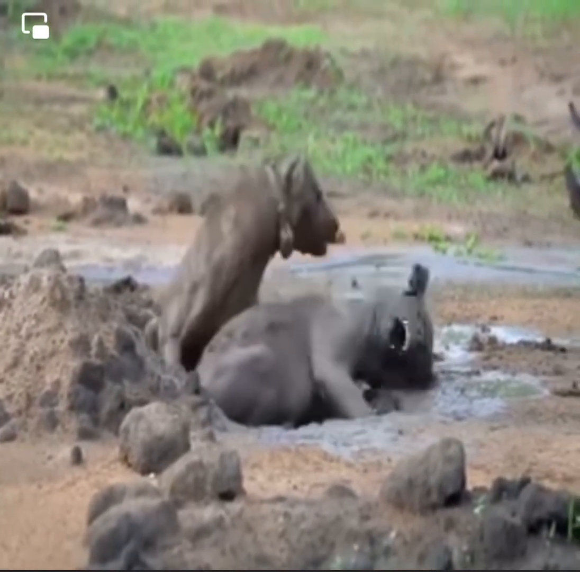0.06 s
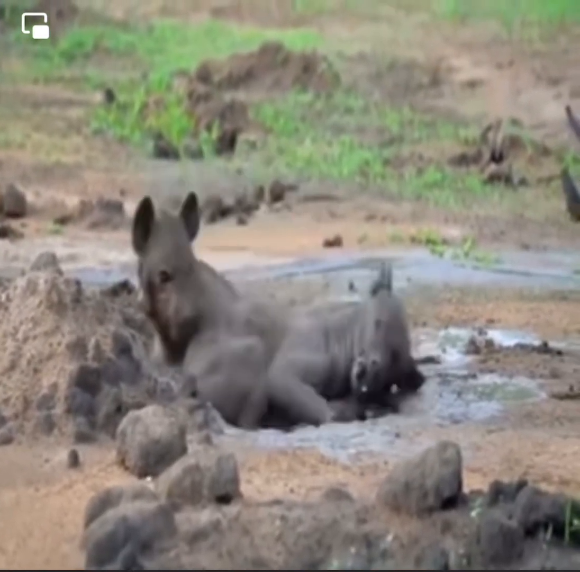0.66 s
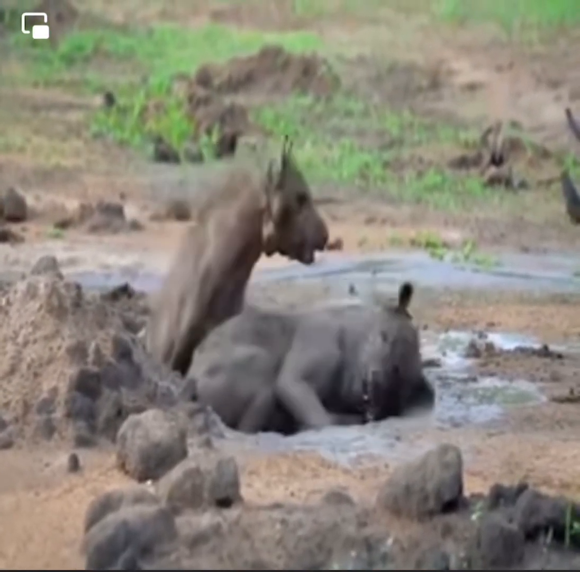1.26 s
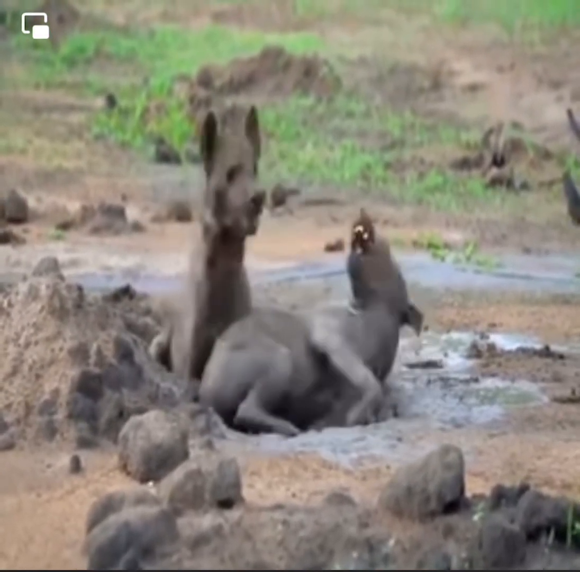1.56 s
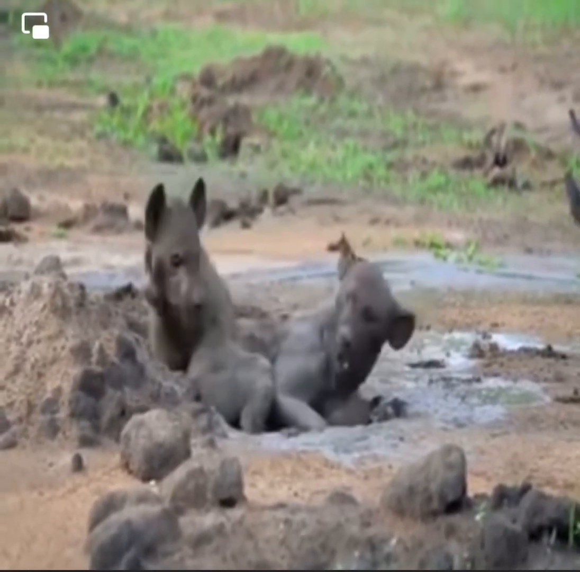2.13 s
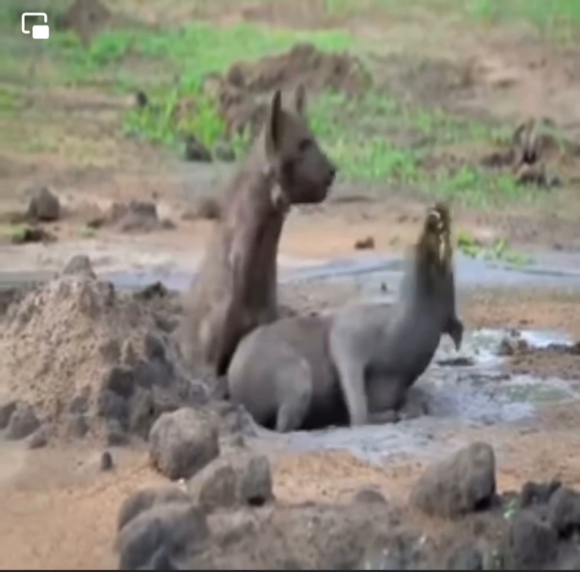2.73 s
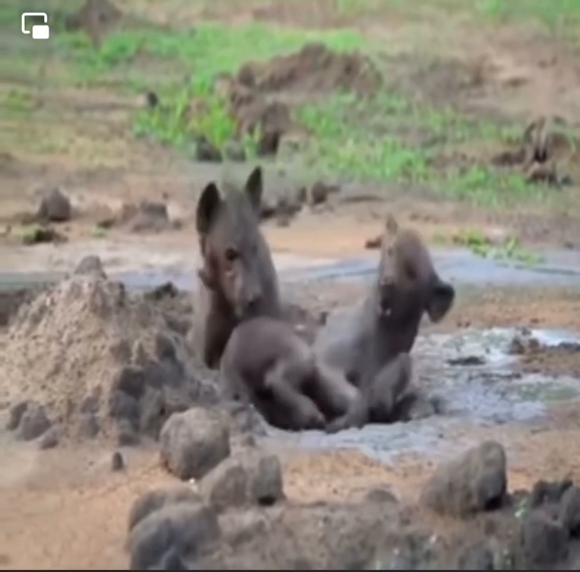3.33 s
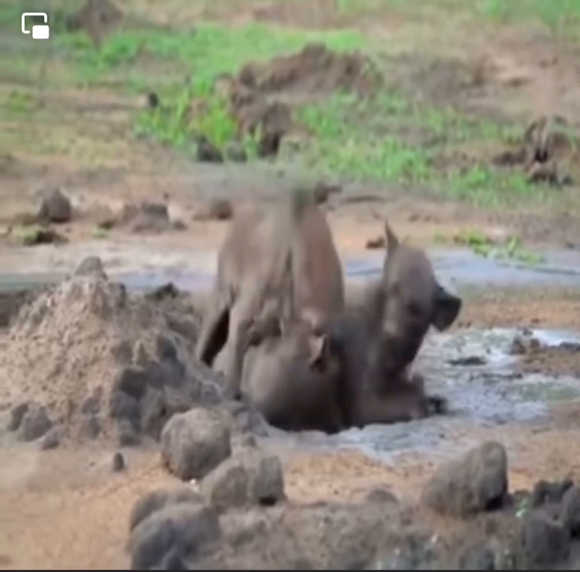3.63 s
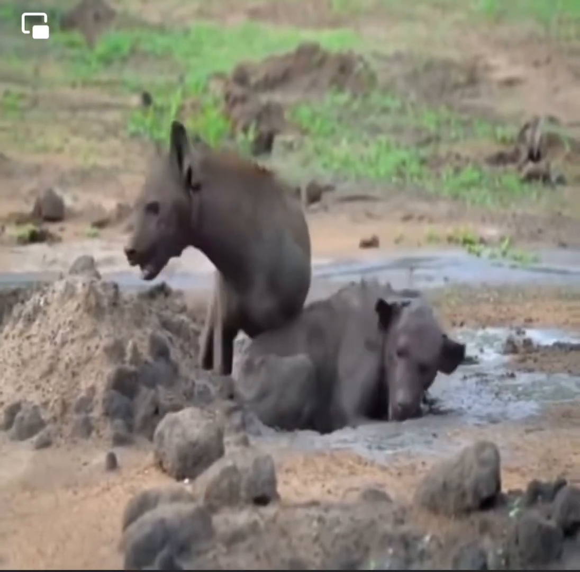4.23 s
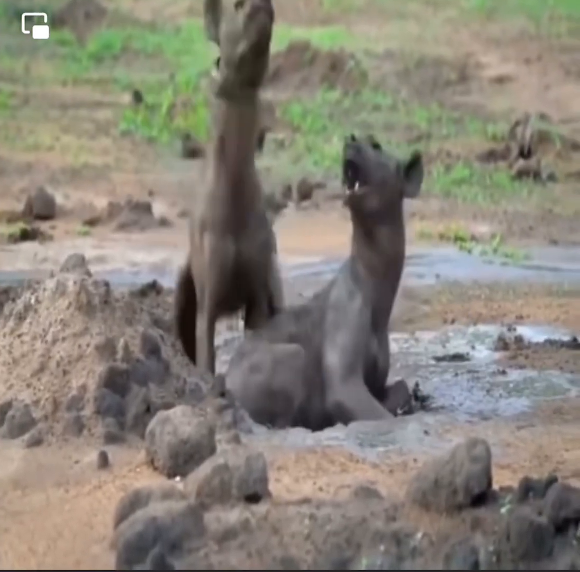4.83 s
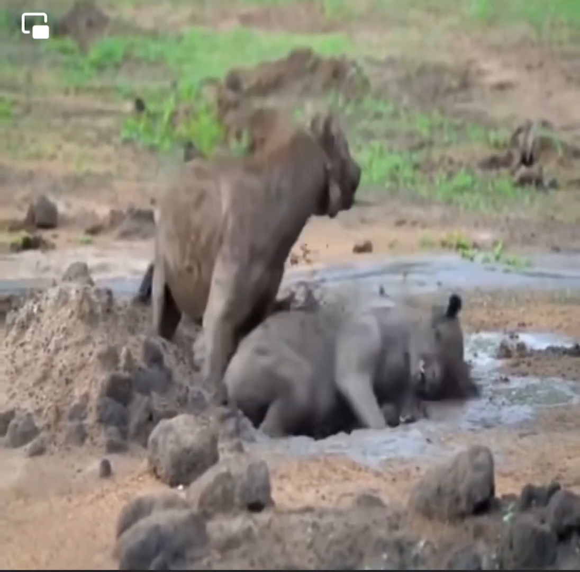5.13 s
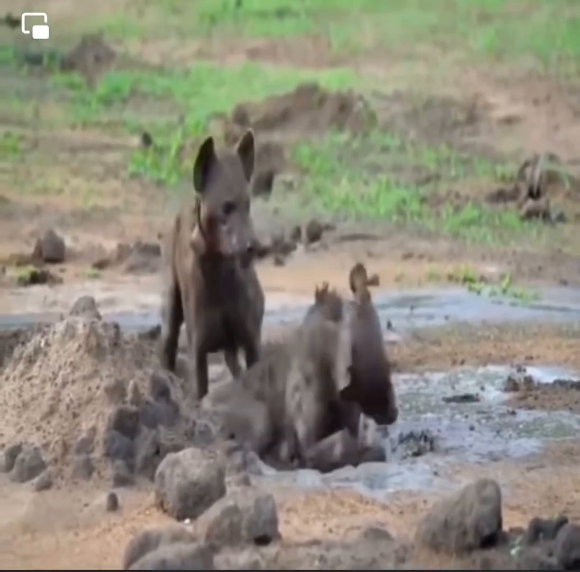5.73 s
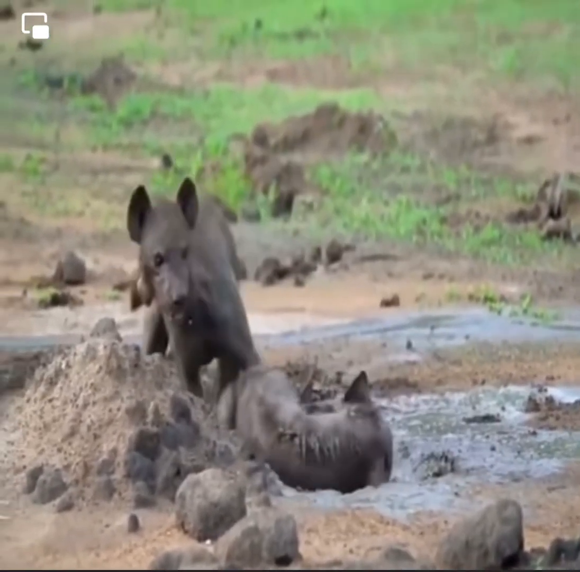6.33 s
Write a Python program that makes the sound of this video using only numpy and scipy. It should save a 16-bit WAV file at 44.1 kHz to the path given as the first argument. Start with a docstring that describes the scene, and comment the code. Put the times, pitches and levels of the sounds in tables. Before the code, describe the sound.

Rattling growls of fighting hyenas build to a yelp and squeal, then sink to a moan, over churning mud and faint bird chirps.

```python
"""Hyenas fighting in a mud hole

Slack vocal folds beat against throat, muzzle and jaw in rattling growls and snarls, then tighten
into a yelp and a harsh squeal; more growls end in a long moan. Mud churns, slops and smacks
under the two animals. A small bird chirps and a far bird coos over a background hiss that ducks
after the squeal. The loudest cries overload the microphone."""
import sys
import numpy as np
from scipy import signal
from scipy.fft import rfft, irfft, next_fast_len
from scipy.io import wavfile
from scipy.ndimage import uniform_filter1d

SR = 44100
rng = np.random.default_rng(int(sys.argv[2]) if len(sys.argv) > 2 else 0)


def bounce(signal):
    """Save signal as a 16-bit WAV file at the path given by the first command-line argument."""
    frames = np.transpose(np.atleast_2d(signal))
    limited = np.clip(frames, -1, 1)
    pcm = np.round(limited * 32767).astype(np.int16)
    wavfile.write(sys.argv[1], SR, pcm)


N = 290023
T = np.arange(N) / SR
THROAT_HZ, MUZZLE_HZ = 323.7, 992  # where the two resonances rest


def fold_beat(levels, throat_hz, muzzle_hz, rough, rebound_gain, rebound_s=.0064, puff_s=.015):
    """One beat of the folds, a weaker rebound and a puff of air ring the throat, muzzle and open jaw."""
    # resonances of the three parts of the voice: (frequency [Hz], gain [dB])
    throat = [(35, -61), (85, -10.5), (165, -6), (220, -10), (280, 0.5), (345, 2.5), (460, -8),
              (550, -19.5), (650, -41), (900, -32), (2500, -58), (8000, -88)]
    muzzle = [(60, -52), (700, -16), (850, -1), (950, 10), (1030, 9.5), (1130, -17.5), (1400, -6.5),
              (1580, -21), (1770, -9), (2500, -25.5), (8000, -52.5)]
    jaw = [(40, -49), (130, -18), (450, 1), (530, -2), (630, 8), (740, 3), (850, -2), (1050, 1.5),
           (1380, 3), (1580, -19), (1720, -4.5), (2120, -10.5), (2500, -49), (5500, -25), (14000, -50)]
    size = 2048
    hz, t = np.fft.rfftfreq(size, 1 / SR), T[:size]
    parts = (read(throat, hz * THROAT_HZ / throat_hz),
             read(muzzle, hz * MUZZLE_HZ / muzzle_hz),
             read(jaw, hz))
    power = sum((amp(db) * unit(amp(part))) ** 2 for db, part in zip(levels, parts))
    log_gain = .5 * np.log(power + 1e-14)
    mirrored = np.r_[log_gain, log_gain[-2:0:-1]]
    tract = np.exp(np.conj(signal.hilbert(mirrored)))[:len(hz)]  # minimum phase: a hit, then its ring
    puff = rfft(.11 * rough * np.exp(-t / puff_s) * rng.standard_normal(size))
    delay_s = rebound_s * (1 + .0904 * rng.standard_normal())
    drive = 1 + rebound_gain * np.exp(-2j * np.pi * hz * delay_s) + puff
    return irfft(tract * drive / np.sqrt(np.mean(abs(drive) ** 2)))


def growl(t, beat_s, rate, rough, throat_db, muzzle_db, jaw_db, muzzle_hz=MUZZLE_HZ):
    """Slack folds beat, once near beat_s; each beat varies in time, strength, sharpness and vowel."""
    # the throat's resonance sinks and rises from growl to growl: (time [s], frequency [Hz])
    throat_vowel = [(1.8, 334), (2.35, 296), (3.0, 335), (5.2, 314), (5.45, 357)]
    throat_hz, = curves(throat_vowel, t)
    cycles = np.cumsum(rate) / SR
    beats = np.flatnonzero(np.diff(np.floor(cycles - np.interp(beat_s, t, cycles))))
    jitter = rough * rng.uniform(-1.344, 1, (100, 5))
    voice = np.zeros(len(t) + SR // 10)
    for k, (late, strong, sharp, throat_shift, muzzle_shift) in zip(beats, jitter):
        levels = np.array([throat_db[k], muzzle_db[k] + 9 * sharp, jaw_db[k] + 9 * sharp]) + 2.5 * strong
        # the folds rebound only in the slow rattle, with the jaw nearly shut
        slowness = np.clip((85 - rate[k]) / 20, 0, 1)
        rebound_gain = .85 * slowness / (1 + amp(jaw_db[k] - throat_db[k]) ** 2)
        vowel = throat_hz[k] * (1 + .08 * throat_shift), muzzle_hz * (1 + .1 * muzzle_shift)
        ring = fold_beat(levels, *vowel, rough, rebound_gain)
        add(voice, k / SR + .09 * late / rate[k], ring * np.sqrt(SR / rate[k]))
    return t[0], voice


def rattles(attack_s=.05, attack_db=16, release_db_per_s=219, tail_s=.079):
    """Slow growls of separate fold beats: each swells in, holds and releases or yields to the next."""
    # (start [s], length [s], first level [dB], last level [dB], beat rate [Hz], roughness [0-1],
    #  muzzle over throat [dB], open jaw over throat [dB], muzzle resonance [Hz])
    cues = [(0.043, 0.19, -30.5, -29.5, 51.47, 0.42, -7, -21, 1073),
            (.281, 0.052, -27, -24, 55.9, 0.18, -4, -1.5, 970),
            (.703, 0.17, -19, -14, 57.6, 0.34, -2.5, -8, 980),
            (.894, 0.062, -11.5, -14, 68.44, 0.32, -7, -4.5, 937),
            (1.661, 0.25, -25.5, -24.5, 58.6, 0.47, -8.5, -3, 1010),
            (1.939, 0.09, -20.5, -19.5, 56.1, 0.52, -8.5, -9.5, 1013),
            (2.049, 0.21, -16.5, -20, 59.46, 0.43, -4, -9.5, 995),
            (2.267, 0.16, -16, -16.5, 57.1, 0.53, -10, -13, 1045),
            (3.09, 0.19, -40, -39, 55.1, .5, 4.5, 0, 1008),
            (3.323, 0.2, -19.5, -28, 52.74, 0.53, -10, -7, 913),
            (3.535, 0.2, -21.5, -14, 55.1, 0.3, -15.5, -13, 940),
            (5.104, 0.076, -27.5, -22.5, 66.1, 0.36, -3, -6, 993),
            (5.18, 0.097, -20.5, -24, 58.8, 0.34, 0, -2.5, 783),
            (5.28, 0.039, -21, -18.5, 58.4, 0.23, -1.5, -3, 1140),
            (5.336, 0.1, -17, -17.5, 69.54, 0.51, -9, -16, 1025),
            (5.46, .15, -23.5, -18.5, 65.8, .55, -14, -8.5, 985),
            (5.622, 0.16, -14.5, -20.5, 68.06, 0.52, -3.5, -15, 1027),
            (5.825, 0.15, -15.5, -15.5, 71.23, 0.53, -9, -10, 1014),
            (5.974, 0.085, -14.5, -18.5, 75.35, 0.24, -1, -7.5, 977)]
    previous_ends = [0] + [cue[0] + cue[1] for cue in cues]
    next_starts = [cue[0] for cue in cues[1:]] + [T[-1]]
    voice = np.zeros(N)
    for since, until, cue in zip(previous_ends, next_starts, cues):
        start, length, first_db, last_db, hz, rough, muzzle_db, jaw_db, muzzle_hz = cue
        half_beat = .5 / hz
        begin = np.clip(since - start, -attack_s, -half_beat)
        end = min(length + tail_s, until - start - half_beat)
        t = np.arange(begin, end, 1 / SR)
        effort = np.interp(t, [0, length], [first_db, last_db])
        effort -= attack_db * np.maximum(-t / attack_s, 0) + release_db_per_s * np.maximum(t - length, 0)
        levels = effort, effort + muzzle_db, effort + jaw_db
        add(voice, *growl(start + t, start, np.full(len(t), hz), rough, *levels, muzzle_hz))
    return voice


def snarls(rise_db=13.5, muzzle_follows=.67, jaw_follows=1.76):
    """Short pushes of faster beats: effort rises, holds and slackens; the jaw gapes near the crest."""
    # (start [s], crest [s], hold [s], end [s], first rate [Hz], crest rate [Hz], last rate [Hz], crest
    #  level [dB], fall [dB], roughness [0-1], muzzle over throat [dB], open jaw over throat [dB])
    cues = [(0.336, 0.344, 0.12, .50, 90.8, 109.3, 144.7, -22.5, 6, 0.35, -10.5, 1),
            (0.491, 0.532, 0.056, .69, 127, 161.7, 124, -13.5, 14.5, 0.12, -4.5, -1.5),
            (1.471, 1.518, 0.046, 1.62, 129.8, 127.3, 111, -28, 22, 0.2, -6.5, -16),
            (2.79, 2.897, 0.039, 3.08, 98, 141.4, 75.1, -21.5, 16, 0.56, -2.5, -9),
            (4.752, 4.932, 0.03, 5.02, 89.8, 78.6, 73, -28.5, 15, 0.45, -5.5, -16)]
    voice = np.zeros(N)
    for start, crest, hold, end, *rates, db, fall_db, rough, muzzle_db, jaw_db in cues:
        t = np.arange(start, end, 1 / SR)
        before = np.interp(t, [start, crest], [1, 0])
        after = np.interp(t, [crest + hold, end], [0, 1])
        slack = rise_db * before ** .81 + fall_db * after ** .7
        rate = np.interp(t, [start, crest, end], rates)
        levels = db - slack, db + muzzle_db - muzzle_follows * slack, db + jaw_db - jaw_follows * slack
        add(voice, *growl(t, crest, rate, rough, *levels))
    return voice


def yelp(rough=.31, hiss_db=-20):
    """The growl tightens into a loud rising cry whose harmonics clear just before the squeal."""
    # (time [s], beat rate [Hz], throat [dB], muzzle [dB], open jaw [dB], clear tone [dB])
    contour = [(3.735, 66, -19, -25, -21, -19), (3.78, 104, -14.5, -19, -19, -15.5),
               (3.815, 116, -15.5, -20, -15.5, -9.5), (3.865, 122, -14.5, -32, -11, -7.5),
               (3.905, 145, -23, -9, -21, -9), (3.95, 197, -48, -13.5, -24, -10),
               (4.005, 196, -48, -12.5, -16.5, -8.5), (4.032, 206, -42, -16, -30, -5.5)]
    # colour of the clear tone and of its hiss: (frequency [Hz], gain [dB])
    cry_tone = [(110, -24), (195, -16), (228, 13.5), (290, 15), (350, 7.5), (395, -20), (490, 6.5),
                (580, 11.5), (780, 11), (860, -6), (960, 5), (1150, 9.5), (1350, 1), (1550, -24),
                (1730, 2.5), (2100, -11.5), (5000, -45)]
    hiss_tone = [(2700, -21), (3400, 26), (3900, -5), (4400, 15), (5200, 6), (7500, -8), (9400, 6.5),
                 (15000, 0)]
    t = span(contour)
    rate, throat_db, muzzle_db, jaw_db, clear_db = curves(contour, t)
    _, beats = growl(t, t[0], rate, rough, throat_db, muzzle_db, jaw_db)
    _, waves = harmonics(rate * (1 + .013 * wander(t, 147)), cry_tone, count=24)
    hiss = amp(hiss_db) * colour(rng.standard_normal(len(t)), hiss_tone)
    hiss *= (rate / rate.max()) ** 3  # grows as the folds tighten
    cry = steady(waves.sum(0), size=800) + hiss
    return t[0], beats[:len(t)] + amp(clear_db) * fade(t, .013) * cry


def squeal(waver_db=4, rasp_db_per_octave=22):
    """The folds tighten and jump to a high falling note; air hisses through the teeth in time."""
    # the falling note: (time [s], pitch [Hz])
    pitch = [(4.012, 427), (4.04, 442.7), (4.1, 434.6), (4.144, 395), (4.19, 376.8), (4.24, 372.8),
             (4.286, 350.7), (4.32, 347), (4.358, 319.5), (4.385, 245.6), (4.45, 125.6)]
    # its lower bands: (time [s], body [dB], edge [dB])
    band_levels = [(4.012, -13, -15.5), (4.054, -7.5, -12), (4.114, -18, -12.5), (4.124, -25, -17),
                   (4.152, -9, -21.5), (4.238, -10, -13), (4.338, -6, -21.5), (4.36, -5.5, -43),
                   (4.392, -12, -40), (4.41, -25.5, -42), (4.45, -31, -50)]
    # its treble: (time [s], overtones [dB], teeth hiss [dB])
    treble_levels = [(4.012, -27, -30), (4.07, -26, -26.5), (4.15, -26, -36.5), (4.25, -28, -36),
                     (4.33, -47, -40), (4.385, -42, -57)]
    # colour of the voice and of the hiss: (frequency [Hz], gain [dB])
    voice_tone = [(240, 17.5), (420, 6), (740, 11.5), (870, 7), (1000, 18), (1150, 5.5), (1500, 5.5),
                  (1760, 3), (1950, -7), (2300, -8.5), (2650, -13.5), (3050, -31), (3450, -8), (3650, -17),
                  (3880, -2.5), (4150, -37), (4390, -9), (4520, -39)]
    teeth_tone = [(3000, -19), (6000, 3.5), (7500, 1), (8700, 7), (9100, 7), (9340, 14.5), (9650, -4),
                  (10300, 0), (11900, 8.5), (13000, 1), (15500, 0.5)]
    t = span(band_levels)
    hz, = curves(pitch, t)
    body_db, edge_db = curves(band_levels, t)
    overtone_db, hiss_db = curves(treble_levels, t)
    rasp_db = -23.5 + rasp_db_per_octave * np.log2(hz / 434)  # dies away as the folds slacken
    hz = hz * (1 + .0032 * wander(t, 250))
    partial_hz, waves = harmonics(hz, voice_tone, count=13)
    waves *= amp(waver_db * np.array([wander(t, 12.2) for _ in waves]))  # each swells on its own
    upper, treble = share_above(partial_hz, 1250), share_above(partial_hz, 2100)
    waves *= 1 + .5 * treble * np.array([wander(t, 120) for _ in waves])  # the treble flickers
    bands = (body_db, 1 - upper), (edge_db, upper - treble), (overtone_db, treble)
    voice = sum(amp(db) * steady((waves * share).sum(0), size=500) for db, share in bands)
    puffs = breath(hz)
    voice += amp(hiss_db + 2.3 * wander(t, 24.5)) * colour(puffs, teeth_tone)
    voice += amp(rasp_db) * colour(puffs, [(150, -25), (1000, 17), (4000, -24)])
    return t[0], voice * fade(t, .009) * amp(.6 * wander(t, 60))


def moan(even_at_s=6.135, even_width_s=.047, vowel_db=15.5, vowel_width_hz=120, breath_db=-20):
    """A husky arched note that drops an octave as the folds fall into strong and weak beats, then sags."""
    # (time [s], pitch [Hz], throat [dB], muzzle [dB])
    contour = [(6.05, 93.6, -17, -19), (6.112, 97, -12, -18), (6.144, 101.1, -20.5, -18),
               (6.206, 120.9, -7.5, -10.5), (6.26, 132.8, -10, -8), (6.366, 121.4, -10.5, -17.5),
               (6.412, 119, -10, -17.5), (6.442, 108.4, -14, -18.5), (6.468, 86.2, -16.5, -31),
               (6.54, 61.4, -39, -30)]
    # colour of the voice: (frequency [Hz], gain [dB])
    voice_tone = [(110, -25.5), (250, -7), (380, -2), (510, -5.5), (650, -9.5), (790, -11.5), (940, -4.5),
                  (1150, -22), (1400, -15.5), (1900, -25.5), (6000, -80)]
    # the muzzle's resonance: (time [s], frequency [Hz])
    vowel = [(6.08, 890), (6.17, 890), (6.29, 920), (6.39, 1050)]
    t = span(contour)
    hz, throat_db, muzzle_db = curves(contour, t)
    vowel_hz, = curves(vowel, t)
    hz = hz * (1 + .01 * wander(t, 160))
    partial_hz, waves = harmonics(hz, voice_tone, count=24)
    evenness = np.exp(-((t - even_at_s) / even_width_s) ** 4)
    waves[::2] *= amp(-50 * evenness)  # while the folds beat evenly, the odd harmonics are gone
    waves *= amp(vowel_db * np.exp(-((partial_hz - vowel_hz) / vowel_width_hz) ** 2))
    waves *= amp(2.5 * np.array([wander(t, 22) for _ in waves]))
    upper = share_above(partial_hz, 720)
    voice = amp(throat_db) * steady((waves * (1 - upper)).sum(0), size=800)
    voice += amp(muzzle_db) * steady((waves * upper).sum(0), size=800)
    husk = colour(breath(hz), [(100, -36), (1100, 8), (2500, -14), (6000, -46)])
    voice += amp(throat_db + breath_db) * husk
    return t[0], voice * fade(t, .018) * amp(1.1 * wander(t, 70))


def harmonics(hz, tone, count):
    """Clean partials of a pitch curve through a vocal tract: their frequencies and waves."""
    k = np.arange(1, count + 1)[:, None]
    lag = rng.uniform(0, 2 * np.pi, (count, 1))
    return k * hz, amp(read(tone, k * hz)) * np.cos(k * phase(hz) + lag)


def breath(hz):
    """Air escapes in one puff of noise for each beat of the folds."""
    return rng.standard_normal(N)[:len(hz)] * (1 + np.cos(phase(hz)))


def grunts():
    """Soft sinking notes from the chest, under the snarls."""
    # (start [s], length [s], first pitch [Hz], last pitch [Hz], level [dB])
    cues = [(1.478, 0.11, 123, 110, -29), (2.781, 0.29, 113, 88, -29), (4.752, 0.224, 108.7, 68.7, -36)]
    voice = np.zeros(N)
    for start, length, first_hz, last_hz, db in cues:
        t = np.arange(0, length, 1 / SR)
        hz = np.linspace(first_hz, last_hz, len(t)) * (1 + .052 * wander(t, 58))
        add(voice, start, amp(db) * fade(t, .023) * np.sin(phase(hz)))
    return voice


def mud_slops():
    """Bodies slap into the wet mud and throw spray."""
    # (start [s], rise [s], decay [s], slap [dB], spray [dB])
    cues = [(0.16, .002, .03, -36, -35), (3.24, 0.0023, 0.024, -28, -54), (5.298, 0.019, .035, -39, -34),
            (5.755, 0.022, 0.015, -27, -34), (5.861, 0.0056, 0.047, -39, -38.5)]
    # colour of the slap and of the spray: (frequency [Hz], gain [dB])
    slap_tone = [(200, 10), (1200, 12.5), (2600, 14), (5000, 6), (15000, -10)]
    spray_tone = [(500, -18), (3000, 0.5), (11000, 0), (15500, -10)]
    slap, spray = np.zeros((2, N))
    for start, rise, decay, slap_db, spray_db in cues:
        envelope = np.clip((T - start) / rise, 0, 1) * np.exp(-np.maximum(T - start - rise, 0) / decay)
        slap += amp(slap_db) * envelope
        spray += amp(spray_db) * envelope
    return slap * colour(crackle(), slap_tone) + spray * colour(crackle(), spray_tone)


def mud_smacks(swell_s=.00227, glide=.5):
    """Air pockets smack in the mud: each swells and dies quickly while its pitch drops into place."""
    # (start [s], resting pitch [Hz], peak level [dB])
    cues = [(1.773, 2380, -20.5), (3.268, 2200, -35), (5.706, 2290, -30), (6.04, 2350, -30)]
    out = np.zeros(N)
    t = T[:SR // 20]
    age = t / swell_s
    for start, rest_hz, db in cues:
        hz = rest_hz * (1 + glide * np.exp(-age) + .34 * wander(t, 770))
        add(out, start, amp(db) * age * np.exp(1 - age) * np.sin(phase(hz)))
    return out


def mud_churn(stir_db_per_s=101, settle_db_per_s=54, gain_db=6):
    """Each lunge stirs up mud and water, which then settle."""
    # (time of peak [s], relative level [dB])
    lunges = [(.17, -38.5), (.55, -33.5), (1.78, -33.5), (2.9, -36.5), (3.3, -37), (3.78, -33.5),
              (5.31, -35.5), (5.8, -36), (6.2, -35)]
    # colour of the churning: (frequency [Hz], gain [dB])
    churn_tone = [(300, 17.5), (5500, 0.5), (8500, -2), (10000, -15), (12000, -8), (15500, -15)]
    stirs = [db - np.maximum(stir_db_per_s * (s - T), settle_db_per_s * (T - s)) for s, db in lunges]
    return amp(np.max(stirs, axis=0) + gain_db + 2 * wander(T, 16)) * colour(crackle(), churn_tone)


def crackle(grains_per_s=5000):
    """Tiny bursting bubbles and drops of uneven size."""
    grains = (rng.random(N) < grains_per_s / SR) * rng.standard_normal(N)
    return grains * amp(-np.minimum(rng.exponential(1, N), 4))


def chirps(sweep_s=.04, low_hz=3110, high_hz=4560, gain_db=-3):
    """A small bird's husky chirps, a sweep up and then a sweep down, blurred by the bushes."""
    # (start [s], delay of the down-sweep [s], relative level [dB])
    cues = [(1.785, 0.083, -36), (1.985, 0.056, -32), (2.323, 0.078, -32), (2.516, 0.054, -30.5),
            (2.875, 0.085, -30.5), (3.085, 0.062, -30.5)]
    out = np.zeros(N)
    t = np.arange(0, sweep_s, 1 / SR)
    up = np.linspace(low_hz, high_hz, len(t))
    for start, delay, db in cues:
        for onset, sweep in ((start, up), (start + delay, up[::-1])):
            hz = sweep * (1 + .05 * wander(t, 600))
            envelope = amp(db + gain_db + 2.1 * wander(t, 110)) * fade(t, .0088)
            add(out, onset, envelope * np.sin(phase(hz)))
    return clearing(out, wet_db=-5, t60=.31)


def coo():
    """A far bird's soft, nearly level note with a weaker octave above."""
    # (start [s], length [s], pitch [Hz], level [dB])
    cues = [(1.117, 0.22, 607, -44)]
    out = np.zeros(N)
    for start, length, hz, db in cues:
        t = np.arange(0, length, 1 / SR)
        angle = phase(hz * (1 + .0044 * wander(t, 21.2)))
        add(out, start, amp(db) * fade(t, .021) * (np.sin(angle) + .45 * np.sin(2 * angle)))
    return out


def background_hiss():
    """Hiss drawn to duck after the loud squeal, as a recorder's automatic gain drops, then recover."""
    # the duck and recovery: (time [s], level [dB])
    hiss_level = [(0, -38.5), (3.6, -35.5), (4.5, -42.5), (5.7, -34.5), (6.57, -38)]
    # colour of the hiss: (frequency [Hz], gain [dB])
    hiss_tone = [(25, -32), (80, 0.5), (523, -1), (1240, 0), (2060, -4.5), (6700, -8.5), (7800, -15),
                 (8800, -18), (10000, -24.5), (15500, -22)]
    db, = curves(hiss_level, T)
    return amp(db + 1.64 * wander(T, 48)) * colour(rng.standard_normal(N), hiss_tone)


def clearing(x, wet_db=-22, t60=.41):
    """Banks and bushes scatter a short tail after the sound."""
    t = T[:SR // 2]
    scatter_tone = [(100, -10), (340, 1.5), (550, -5.5), (1000, -2.5), (10000, -17)]
    tail = colour(rng.standard_normal(len(t)), scatter_tone)
    tail *= amp(-60 * t / t60) * np.minimum(t / .0056, 1)
    return x + amp(wet_db) * signal.fftconvolve(x, tail / np.linalg.norm(tail))[:N]


def amp(db):
    """Decibels to gain."""
    return 10 ** (np.asarray(db) / 20)


def phase(hz):
    """The running phase of a pitch curve, in radians."""
    return 2 * np.pi * np.cumsum(hz) / SR


def share_above(hz, corner_hz):
    """A crossover from 0 to 1, 100 Hz wide."""
    return np.clip((hz - corner_hz) / 100 + .5, 0, 1)


def unit(x):
    """Scales to rms 1."""
    return x / np.sqrt(np.mean(x ** 2) + 1e-20)


def steady(x, size):
    """Scales to a running rms of 1, keeping the single pulses."""
    return x / np.sqrt(abs(uniform_filter1d(uniform_filter1d(x ** 2, size), size)) + 1e-12)


def read(points, hz):
    """A spectrum in dB on a log-frequency axis."""
    f, db = np.transpose(points)
    return np.interp(np.log(hz + 1), np.log(f + 1), db)


def curves(rows, t):
    """Every column of a table at the times t."""
    s, *columns = np.transpose(rows)
    return [np.interp(t, s, c) for c in columns]


def span(rows):
    """The sample times that a table covers."""
    return np.arange(rows[0][0], rows[-1][0], 1 / SR)


def add(mix, s, sound):
    """Mixes a sound in at s seconds."""
    part = mix[max(round(s * SR), 0):][:len(sound)]
    part += sound[:len(part)]


def fade(t, edge_s):
    """Soft start and end."""
    return np.clip(np.minimum(t - t[0], t[-1] - t) / edge_s, 0, 1)


def colour(x, tone):
    """Equalises a signal by (frequency [Hz], gain [dB]) points, at rms 1."""
    size = next_fast_len(len(x))
    gain = amp(read(tone, np.fft.rfftfreq(size, 1 / SR)))
    return unit(irfft(rfft(x, size) * gain, size)[:len(x)])


def wander(t, hz):
    """Smooth random motion of rms about 1, up to a rate."""
    knots = rng.standard_normal(8192)
    return np.interp((t - t[0]) * 2 * hz, np.arange(len(knots)), knots)


def scene():
    """Hyenas and birds sound in the clearing, over the mud and the background hiss."""
    hyenas = rattles() + snarls() + grunts()
    for cry in (yelp, squeal, moan):
        add(hyenas, *cry())
    hiss = background_hiss()
    calls = clearing(hyenas + chirps() + coo())
    mud = mud_smacks() + mud_slops() + mud_churn()
    return (calls + mud + hiss)[None]


def record(dry, cutoff_hz=15750):
    """The overloaded microphone flattens peaks at full scale; a steep low-pass trims the top."""
    clipped = dry / (1 + dry ** 8) ** (1 / 8)
    low_pass = signal.firwin(511, cutoff_hz, window=("kaiser", 9), fs=SR)
    return signal.oaconvolve(clipped, low_pass[None], "same")


dry = scene()
out = record(dry)
bounce(out)
```